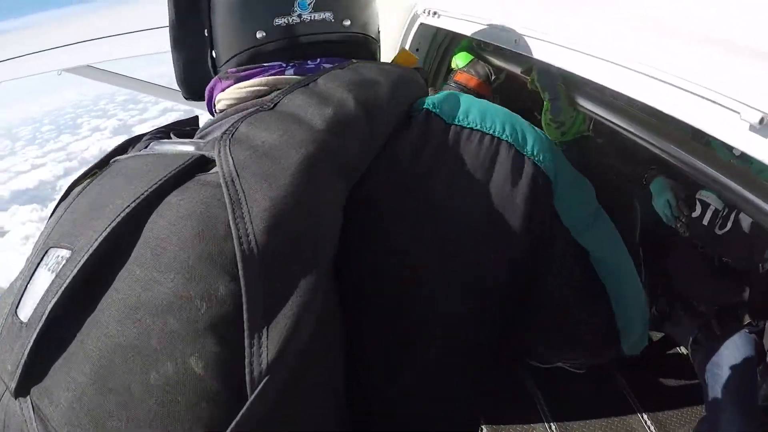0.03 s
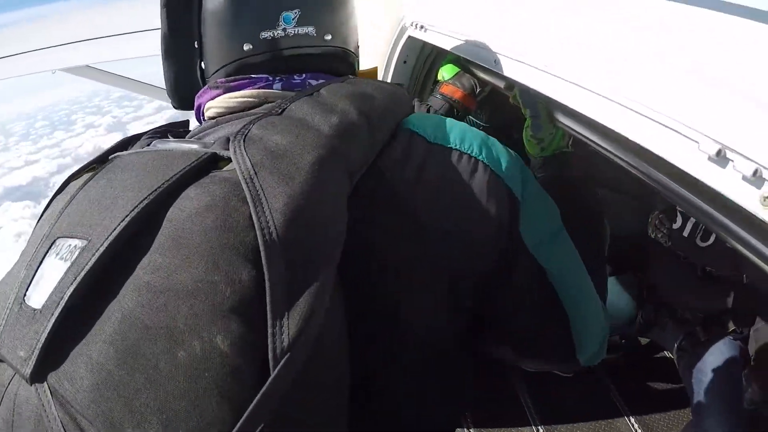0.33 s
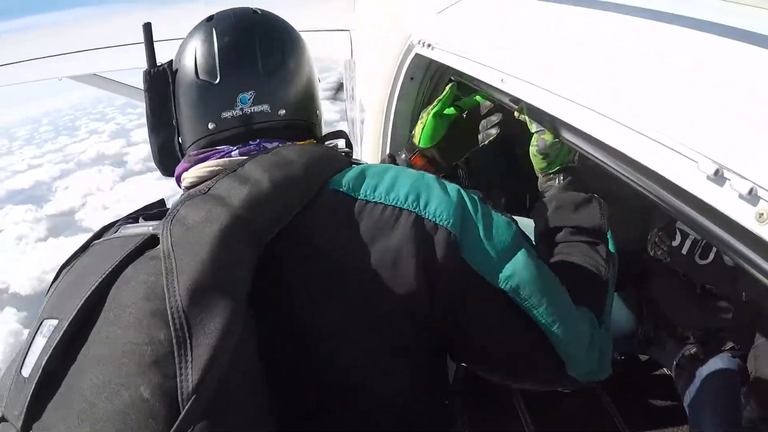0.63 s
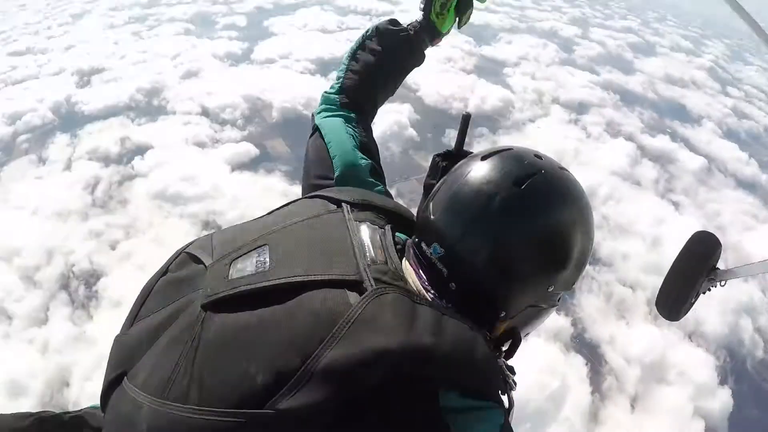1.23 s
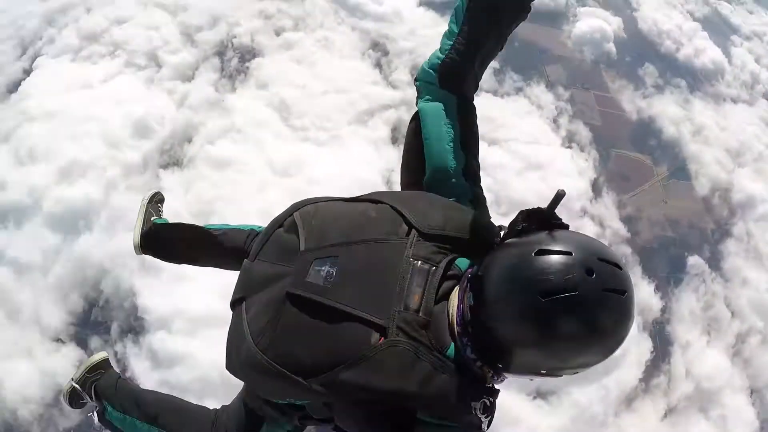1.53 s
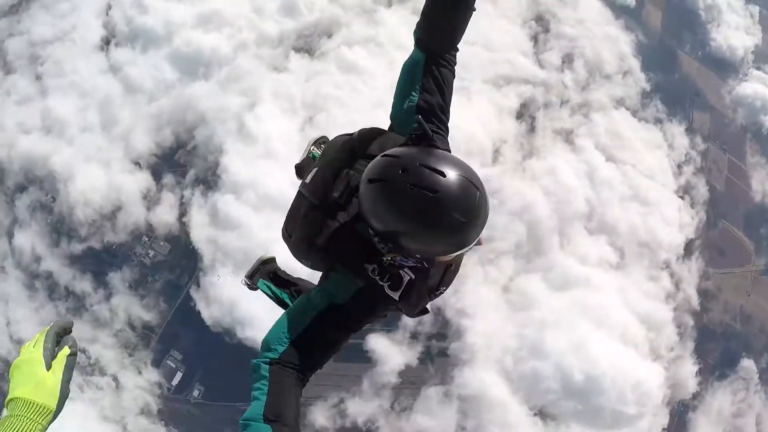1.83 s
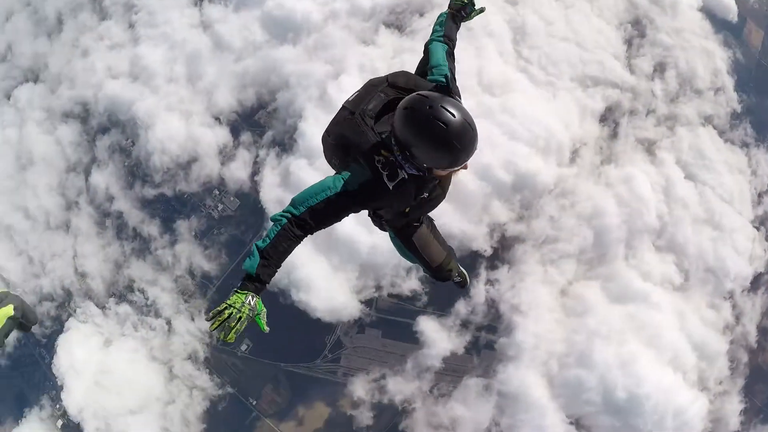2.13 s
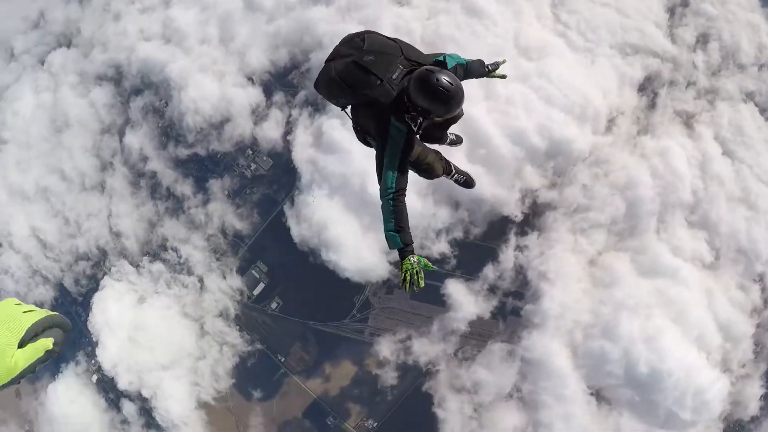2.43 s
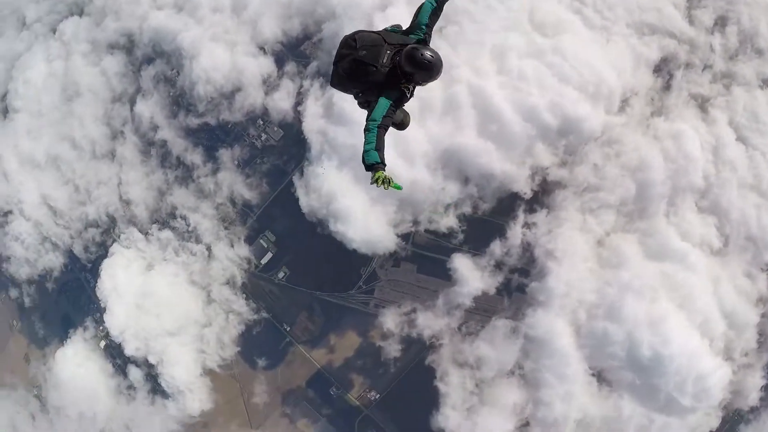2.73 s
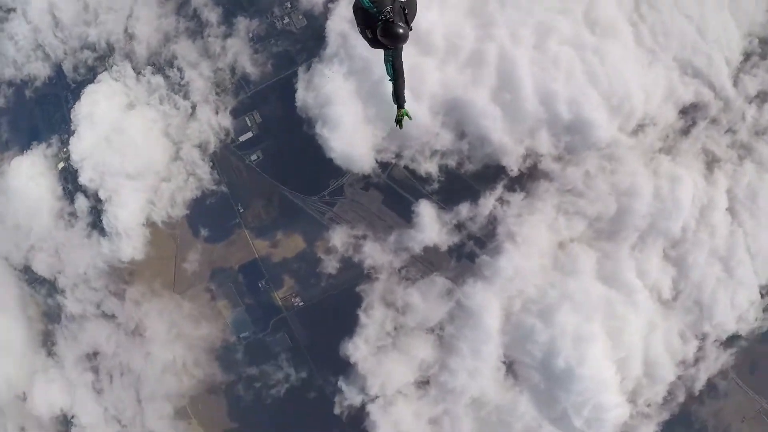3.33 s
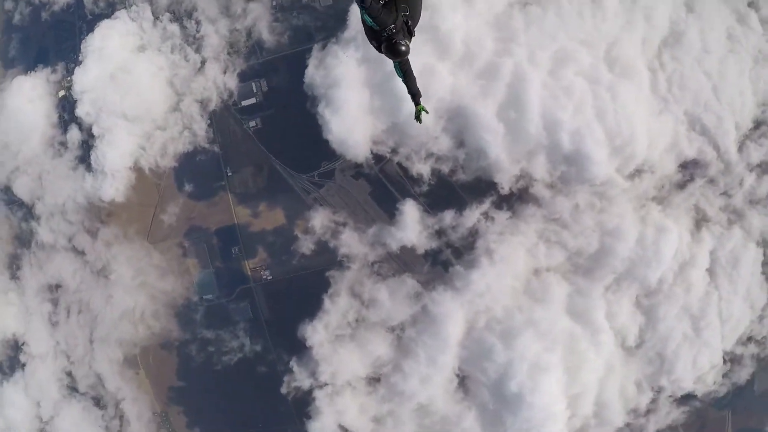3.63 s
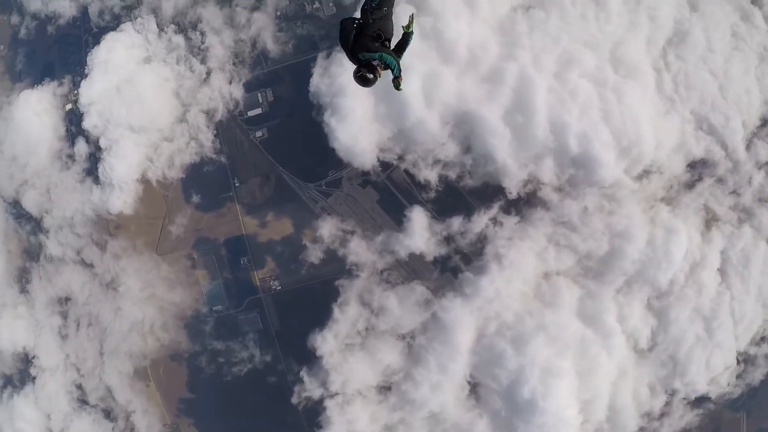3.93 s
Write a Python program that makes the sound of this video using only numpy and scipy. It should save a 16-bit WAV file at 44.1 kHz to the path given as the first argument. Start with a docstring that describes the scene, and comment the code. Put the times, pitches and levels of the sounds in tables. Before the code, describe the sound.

Heavy wind pounds and tears at a microphone worn by a skydiver in an aircraft doorway. After a brief lull, the propeller roar passes and dulls with distance, leaving a rumbling rush of air with more flapping near the end.

```python
"""At the open door of a small aircraft, a skydiver's camera hangs in the slipstream, then drops into freefall.
Turbulent eddies pound the microphone: large ones give low rumble, small ones flapping, tearing and slaps.
The wind lulls at the jump, the broadband roar of engine and propeller swells past and dulls with distance,
and a steady rush of air remains until the buffeting picks up again."""
import sys
import numpy as np
from scipy import signal
from scipy.fft import rfft, irfft
from scipy.io import wavfile
from scipy.ndimage import uniform_filter1d, minimum_filter1d

SR = 44100
rng = np.random.default_rng(int(sys.argv[2]) if len(sys.argv) > 2 else 0)


def master_out(mix):
    """Clip the mix to full scale and print it as 16-bit PCM to the path in sys.argv[1]."""
    frames = np.transpose(np.atleast_2d(mix))
    ceiling = np.clip(frames, -1, 1)
    pcm = np.round(ceiling * 32767).astype(np.int16)
    wavfile.write(sys.argv[1], SR, pcm)


N = 176400
TIME = np.arange(N) / SR


def amp(db):
    """Amplitude grows tenfold for every 20 dB."""
    return 10 ** (np.asarray(db) / 20)


def unit(x):
    """Normalisation to rms 1."""
    return x / np.sqrt(np.mean(x ** 2) + 1e-20)


def curve(table, column=1):
    """Linear interpolation of one column of a time table at every sample."""
    rows = np.array(table)
    return np.interp(TIME, rows[:, 0], rows[:, column])


def colour(x, spectrum):
    """Spectral shaping by levels interpolated over log frequency, at rms 1."""
    hz, db = np.transpose(spectrum)
    gain = amp(np.interp(np.log(np.fft.rfftfreq(N, 1 / SR) + 1), np.log(hz), db))
    return unit(irfft(rfft(x) * gain, N))


def lowpass(x, hz, order=2):
    """Zero-phase low-pass filtering: smoothing without delay."""
    return irfft(rfft(x) / np.sqrt(1 + (np.fft.rfftfreq(N, 1 / SR) / hz) ** (2 * order)), N)


def wander(slow_hz, fast_hz):
    """Band-limited random fluctuation, softly bounded at plus and minus 2."""
    x = lowpass(rng.standard_normal(N), fast_hz)
    return 2 * np.tanh(unit(x - lowpass(x, slow_hz)) / 2)


def tilted(x, slope_db):
    """Time-varying spectral tilt in dB per octave, pivoting at 1400 Hz and flat below 700 Hz."""
    hz, t, frames = signal.stft(x, SR, nperseg=512)
    octaves = np.log2(np.maximum(hz, 700) / 1400)[:, None]
    gain = amp(octaves * np.interp(t, TIME, slope_db))
    return signal.istft(frames * gain, SR, nperseg=512)[1][:N]


def even_noise(spectrum, span_hz, floor, evenness=1):
    """Envelope compression: dividing noise by a power of its envelope evens out its strength."""
    x = colour(rng.standard_normal(N), spectrum)
    power = abs(lowpass(x ** 2, span_hz)) + floor
    return unit(x / power ** (evenness / 2))


def turbulence(spectrum, flutter_db):
    """Intermittency: turbulent noise comes in brief bursts while its mean power holds steady."""
    bursts = amp(flutter_db)
    bursts /= np.sqrt(uniform_filter1d(bursts ** 2, size=8000))
    return colour(bursts * rng.standard_normal(N), spectrum)


# The rustle's crest time in seconds, level in dB and half-width in seconds.
RUSTLE_SWELL = (3.335, -56, 0.026)
# Rustle spectrum. Each row: frequency in Hz, relative level in dB.
RUSTLE_SPECTRUM = [(4000, -27), (6200, -5), (7600, 1), (8400, -13), (10000, -11), (11500, -31)]
def rustle(rough_db=4):
    """Fast amplitude modulation roughens high noise into a brief, cloth-like rustle."""
    crest, db, width = RUSTLE_SWELL
    grains = rng.standard_normal(N) * amp(rough_db * wander(30, 250))
    return colour(grains, RUSTLE_SPECTRUM) * amp(db) * np.exp(-((TIME - crest) / width) ** 2)


# Hollow band in the aircraft's roar. Each row: time in seconds, level in dB, centre in Hz.
HOWL_GLIDE = [(.9, -52, 2996), (1.11, -47.5, 2910), (1.35, -45, 2600), (1.57, -44, 2450),
              (1.59, -26.5, 2347), (1.605, -36, 2404), (1.74, -36.5, 2200), (1.87, -37, 1890),
              (2.0, -41.5, 1740), (2.15, -48, 1554), (3.0, -47.5, 1247), (3.6, -51, 1189)]
def howl(half_width_hz=380):
    """A broad resonance confines noise to a band, which sinks as the aircraft recedes."""
    band = lowpass(rng.standard_normal(N), half_width_hz, order=3)
    carrier = np.cos(2 * np.pi * np.cumsum(curve(HOWL_GLIDE, column=2)) / SR)
    return unit(band * carrier) * amp(curve(HOWL_GLIDE))


# Rush of the fall. Each row: time in seconds, level in dB.
RUSH_LEVELS = [(0, -56), (1.3, -60.5), (1.8, -29.5), (2.3, -35), (2.9, -32.5), (3.3, -31), (4, -33.5)]
# Rush spectrum. Each row: frequency in Hz, relative level in dB.
RUSH_SPECTRUM = [(100, 1.5), (400, 6), (800, -0.5), (1400, -4), (2000, -10), (2800, -15.5), (3800, -15.5),
                 (4400, -17.5), (6100, -19), (7300, -30), (9000, -37.5), (11000, -50.5)]
def rush(crests):
    """Flow noise: air streaming past the helmet gives a smooth broadband hiss."""
    return turbulence(RUSH_SPECTRUM, flutter_db=2 * wander(2.6, 70) + crests) * amp(curve(RUSH_LEVELS))


# Passing aircraft. Each row: time in seconds, level in dB, tilt in dB per octave.
ROAR_PASSAGE = [(0, -42.5, -8.5), (1.07, -30, -4.5), (1.095, -40, -8), (1.135, -45, 0), (1.15, -29, -0.5),
                (1.26, -34.5, -0.5), (1.4, -31, 3), (1.52, -27.5, 0), (1.61, -27.5, 0.9),
                (1.74, -27.5, 2.5), (1.83, -31, -2), (1.98, -30.5, -3), (2.15, -37.5, 0), (2.6, -36.5, -4),
                (4, -78.5, -12)]
# Roar spectrum. Each row: frequency in Hz, relative level in dB.
ROAR_SPECTRUM = [(100, -10.5), (400, 7.5), (900, 0.5), (1400, 1.5), (2100, -1), (2900, -9), (3600, -9),
                 (4200, -13), (5900, -18), (6600, -33.5), (7500, -40.5), (9000, -47), (11000, -63)]
def aircraft():
    """Attenuation with distance: the roar of engine and propeller wash fades and dulls as it recedes."""
    roar = turbulence(ROAR_SPECTRUM, flutter_db=2 * wander(2.1, 51))
    return tilted(roar, curve(ROAR_PASSAGE, column=2)) * amp(curve(ROAR_PASSAGE))


# Slow heaving of the air. Each row: time in seconds, level in dB.
HEAVE_LEVELS = [(0, -30), (.7, -30.5), (1.1, -30), (1.4, -21.5), (1.85, -13.5), (2.2, -21), (2.75, -18.5),
                (3.2, -21.5), (4, -19)]
# Heave spectrum. Each row: frequency in Hz, relative level in dB.
HEAVE_SPECTRUM = [(8, -24.5), (22, 1), (45, 4), (70, 0.5), (110, -14.5), (250, -41), (600, -89.5)]
def heave():
    """Frequency falls with eddy size: the largest, met in open air, are felt more than heard."""
    return colour(rng.standard_normal(N), HEAVE_SPECTRUM) * amp(curve(HEAVE_LEVELS))


# Big single eddies in the fall. Each row: crest time in seconds, level in dB, pitch in Hz.
THROB_EDDIES = [(1.774, -9, 115), (1.891, -10.5, 109.4), (1.975, -10.5, 100), (2.125, -16.5, 226.7),
                (2.195, -9, 99.75), (2.28, -12.5, 211.9), (2.419, -15, 220.2), (2.52, -19, 217.2),
                (2.658, -18, 210), (2.708, -13, 100), (2.755, -16, 44.5), (3.009, -8.5, 105),
                (3.06, -19.5, 230), (3.135, -18.5, 215)]
def throbs(waver=0.17, half_width_s=0.023):
    """Each passing eddy is a wave packet: a few uneven pressure swings that swell and fade."""
    out = np.zeros(N)
    clock = np.cumsum(1 + waver * wander(8.3, 70)) / SR
    for crest, db, hz in THROB_EDDIES:
        swing = np.sqrt(2) * np.sin(2 * np.pi * (hz * clock + rng.random()))
        out += amp(db) * np.exp(-((TIME - crest) / half_width_s) ** 2) * swing
    return out


# Slaps of air. Each row: peak time in seconds, pop level in dB, crack level in dB, decay in seconds.
SLAP_STRIKES = [(0.044, -23, -40, 0.0034), (.085, -19, -35, 0.0055), (0.096, -18, -30, 0.0033),
                (0.118, -14, -31, 0.0012), (0.123, -14, -21.5, .002), (0.151, -19, -23.5, 0.00054),
                (0.16, -15.5, -35, .003), (0.201, -26, -37, 0.0013), (.239, -14.5, -39, .002),
                (.245, -15, -31, .001), (.26, -16, -36, 0.0017), (0.309, -17, -35, .001),
                (.32, -10.5, -29.5, 0.0014), (.358, -11.5, -28, 0.0024), (0.367, -19, -36, 0.0018),
                (.403, -15, -28, 0.0017), (.421, -15, -25.5, .002), (.453, -16, -28.5, 0.001),
                (0.568, -15, -27, 0.0014), (.668, -15, -23, 0.0032), (.705, -20, -20, 0.0021),
                (0.719, -23, -22, 0.00073), (0.833, -8, -13, 0.0015), (.95, -8, -31, 0.0013),
                (.997, -12, -23, 0.0012), (1.009, -25, -27, 0.0022), (1.022, -12, -31, 0.00092),
                (1.122, -23, -43, .0015), (1.142, -21, -40, .004), (1.315, -18.5, -37, 0.0024),
                (1.546, -18, -28, 0.0027), (1.589, -19, -23.5, .004), (1.658, -25, -25, .003),
                (1.68, -21, -26, 0.004), (1.773, -23, -24.5, .002), (3.368, -19, -33, .0015),
                (3.423, -17, -38, 0.0017), (3.541, -23, -31, .003), (3.561, -19, -30.5, .005),
                (3.606, -22, -38, .003), (3.627, -19, -36, 0.0027), (3.662, -23, -37, 0.0042),
                (3.681, -20, -33, 0.0035), (3.698, -23, -35, 0.0036), (3.72, -23, -34, .002),
                (3.744, -22, -32.5, .002), (3.814, -17.5, -35, 0.0018), (3.886, -24, -31, 0.0038),
                (3.99, -26, -40, 0.0018)]
# Spectra of the dull pop and the bright crack. Each row: frequency in Hz, relative level in dB.
POP_SPECTRUM = [(100, -5), (350, 10.5), (1000, 1.5), (1500, 0.5), (2400, -11), (3500, -23.5), (5800, -30.5),
                (7400, -60.5)]
CRACK_SPECTRUM = [(500, -23.5), (2200, 6), (3200, 3.5), (4200, -1), (5800, -7), (6600, -23.5),
                  (7400, -30.5), (9000, -32), (11000, -48)]
def slaps(rise_s=0.00059):
    """A short impulse has a wide spectrum: a sharp eddy strikes the microphone with a pop and a crack."""
    pop_gain, crack_gain = np.zeros((2, N))
    for peak, pop_db, crack_db, decay in SLAP_STRIKES:
        t = TIME - peak
        time_constants = np.maximum(-t / rise_s, t / decay)
        envelope = np.exp(-np.minimum(time_constants, 20))
        pop_gain += amp(pop_db) * envelope
        crack_gain += amp(crack_db) * envelope
    pop = even_noise(POP_SPECTRUM, span_hz=150, floor=0.084)
    crack = even_noise(CRACK_SPECTRUM, span_hz=150, floor=0.084)
    return pop * pop_gain + crack * crack_gain


# Slipstream. Each row: time in seconds, level in dB, tilt in dB per octave, raggedness in dB.
TEAR_COURSE = [(0, -27.5, -4.5, -1), (.09, -28, -6.5, 4.5), (.2, -32.5, -4.5, 5.5), (.33, -29, -4.5, 2),
               (.39, -27.5, -3, 6.5), (.47, -24.5, -2.5, 1), (.56, -22.5, -1, 1), (.7, -22.5, -0.5, 0.5),
               (.78, -24, -1.5, 2), (.85, -22.5, 1.5, 1.5), (.93, -26, -1, -1), (1.0, -19.5, -3.5, 4.5),
               (1.04, -31.5, -4, 2), (1.11, -30, -3.5, 0), (1.2, -77, -4.5, 0), (3.0, -54, -4, 4.5),
               (3.2, -53, -1.5, 3.5), (3.275, -31.5, -4, -0.5), (3.35, -39, -12, 6), (3.62, -34.5, -6, 6.5),
               (3.87, -44, -3, 6.5), (4, -45, 0, 4.5)]
# Tearing spectrum. Each row: frequency in Hz, relative level in dB.
TEAR_SPECTRUM = [(100, -14.5), (400, -11), (1000, 2.5), (2000, -3), (3200, -6.5), (4200, -11), (5800, -15),
                 (6500, -25.5), (7300, -36.5), (9000, -36.5), (11000, -58)]
def tear(crests, flow):
    """Fine turbulence at the camera's edge makes bright, ragged noise, strongest at pressure crests."""
    unsteady = 0.88 * flow + 0.37 * wander(40, 330)
    ragged_db = curve(TEAR_COURSE, column=3) * unsteady
    tearing = turbulence(TEAR_SPECTRUM, flutter_db=ragged_db + 6 * crests)
    return tilted(tearing, curve(TEAR_COURSE, column=2)) * amp(curve(TEAR_COURSE))


# Buffeting of the camera. Each row: time in seconds, level in dB.
BUFFET_LEVELS = [(0, -17.5), (.3, -17), (.55, -12), (.8, -13.5), (1.02, -17.5), (1.11, -28.5), (1.16, -22),
                 (1.3, -24.5), (1.43, -15), (1.54, -24.5), (1.8, -23), (2.2, -36.5), (2.85, -43),
                 (3.22, -34), (3.31, -19.5), (3.6, -19), (3.87, -16.5), (4, -18.5)]
# Buffet spectrum. Each row: frequency in Hz, relative level in dB.
BUFFET_SPECTRUM = [(40, -32), (130, 2), (210, 0.5), (350, -3), (530, -8.5), (1000, -22.5), (2000, -44),
                   (3800, -40.5), (5800, -49), (7500, -71.5), (11000, -90.5)]
def buffet(crests, flow):
    """Unsteady flow modulates the noise of eddies breaking on the camera into a dull flapping."""
    return turbulence(BUFFET_SPECTRUM, flutter_db=3.5 * flow + crests) * amp(curve(BUFFET_LEVELS))


# Gaps in the wind. Each row: start in seconds, length in seconds, depth in dB.
WIND_LULLS = [(0.026, 0.013, -9), (0.164, 0.014, -0.5), (0.252, 0.025, -4.5), (0.312, 0.0075, -8),
              (0.326, 0.026, -4), (0.457, 0.01, -7.5), (1.089, 0.051, -7), (2.585, 0.027, -3),
              (3.745, 0.027, -5.5), (3.907, 0.036, -3.5)]
def lulls(fall_s=0.0053, return_s=0.00077):
    """Wind noise follows the flow: its gain dips as the wind drops out, then snaps back."""
    db = np.zeros(N)
    for start, length, depth in WIND_LULLS:
        begun = (1 + np.tanh((TIME - start) / fall_s)) / 2
        lasting = (1 - np.tanh((TIME - start - length) / return_s)) / 2
        db += depth * begun * lasting
    return amp(db)


# Low pounding of the air. Each row: time in seconds, level in dB.
RUMBLE_LEVELS = [(0, -10), (.4, -9.5), (.8, -10), (1.07, -12), (1.11, -16.5), (1.15, -13.5), (1.5, -17),
                 (1.7, -14), (1.88, -13), (2.35, -11.5), (2.7, -13.5), (2.85, -10.5), (3.05, -10.5),
                 (3.3, -10.5), (4, -12)]
# Rumble spectrum. Each row: frequency in Hz, relative level in dB.
RUMBLE_SPECTRUM = [(8, -32.5), (25, -19), (48, -5), (72, -0.8), (100, 0.4), (130, 0), (165, -7.5),
                   (220, -9.5), (300, -19.5), (420, -41), (900, -96)]
def rumble():
    """Pseudo-sound: large eddies press directly on the microphone, in swings of similar size."""
    swings = even_noise(RUMBLE_SPECTRUM, span_hz=12, floor=0.073, evenness=0.41)
    return swings * amp(curve(RUMBLE_LEVELS))


def scene():
    """Superposition at one microphone; one unsteady flow drives both dull and bright turbulence."""
    pressure = rumble()
    crests = np.minimum(abs(unit(pressure)), 2)
    flow = wander(slow_hz=7.7, fast_hz=92.5)
    wind = (pressure + heave() + buffet(crests, flow) + tear(crests, flow)) * lulls()
    return (wind + aircraft() + rush(crests) + slaps() + throbs() + rustle() + howl())[None]


def record(dry, ceiling=0.79, smooth_hz=160, cutoff_hz=12000):
    """Peak limiting by a fast, smoothed gain, then band limiting by a low-pass filter."""
    needed_gain = np.minimum(1, ceiling / (abs(dry[0]) + 1e-9))
    gain = lowpass(minimum_filter1d(needed_gain, size=220), smooth_hz)
    band_limit = signal.firwin(511, cutoff_hz, window=("kaiser", 9), fs=SR)
    return signal.oaconvolve(dry * gain, band_limit[None], "same")


dry = scene()
out = record(dry)
master_out(out)
```